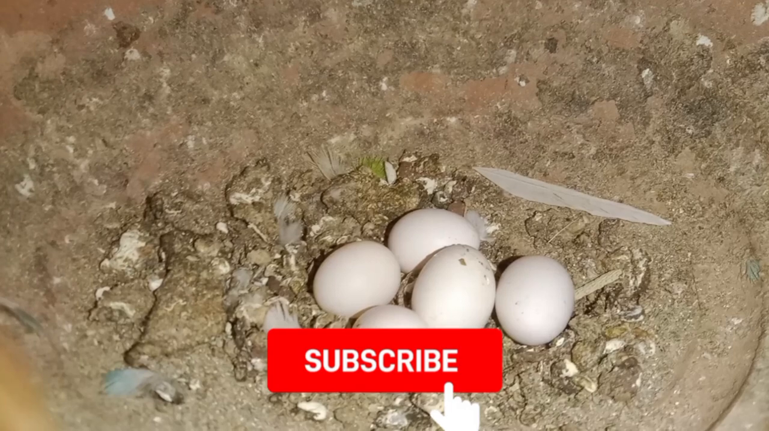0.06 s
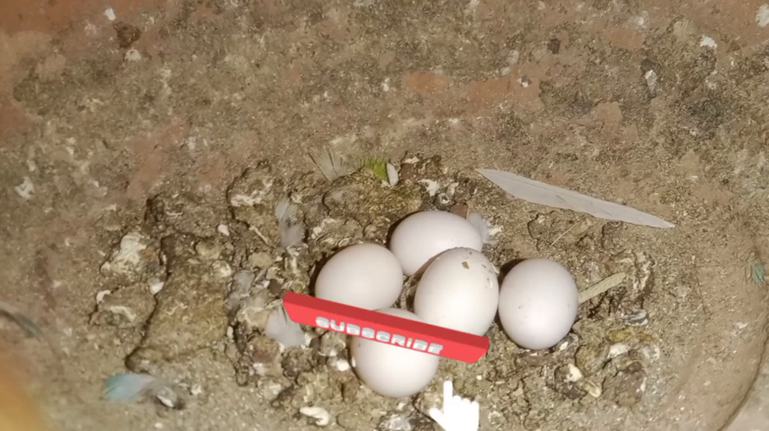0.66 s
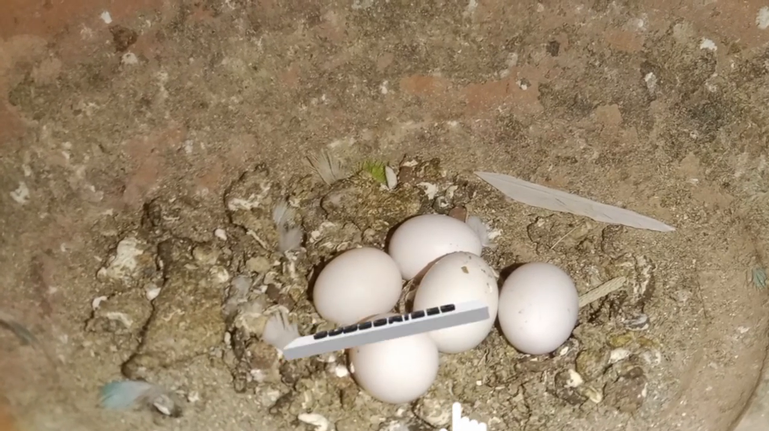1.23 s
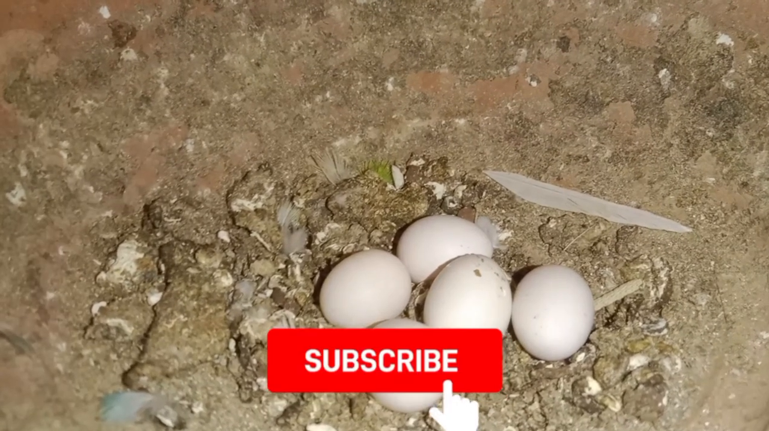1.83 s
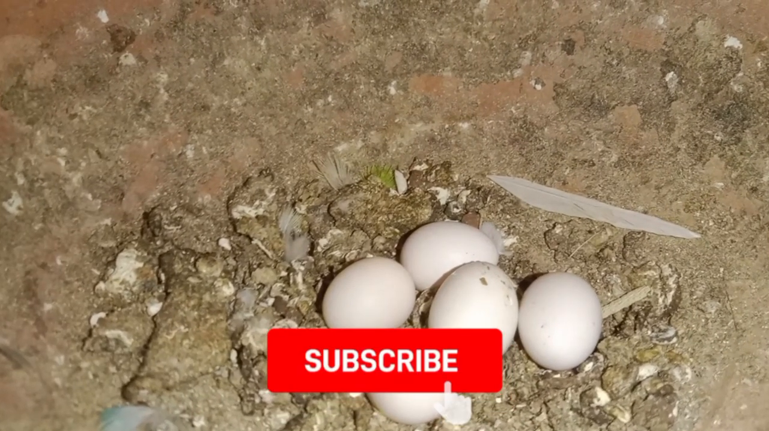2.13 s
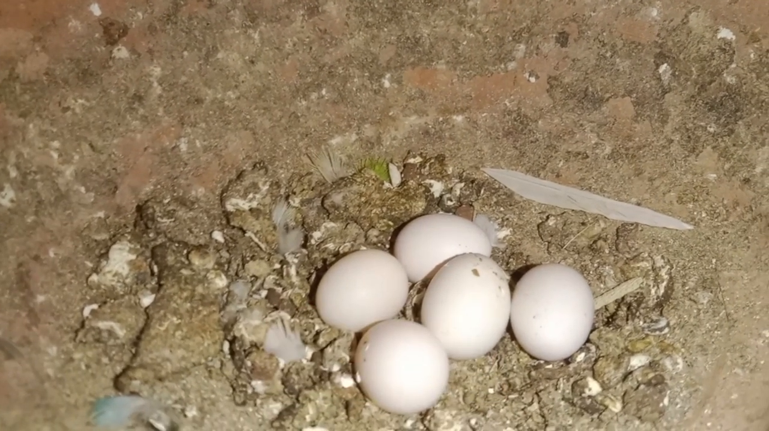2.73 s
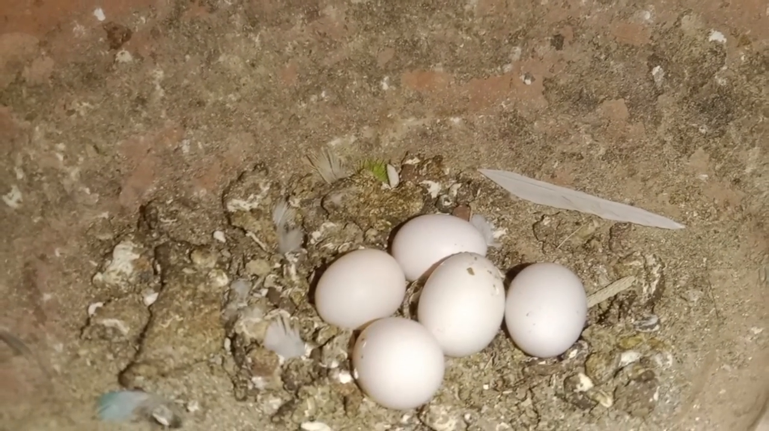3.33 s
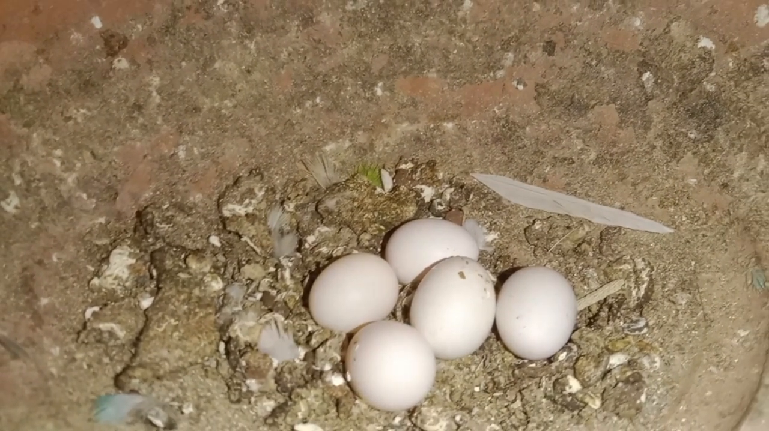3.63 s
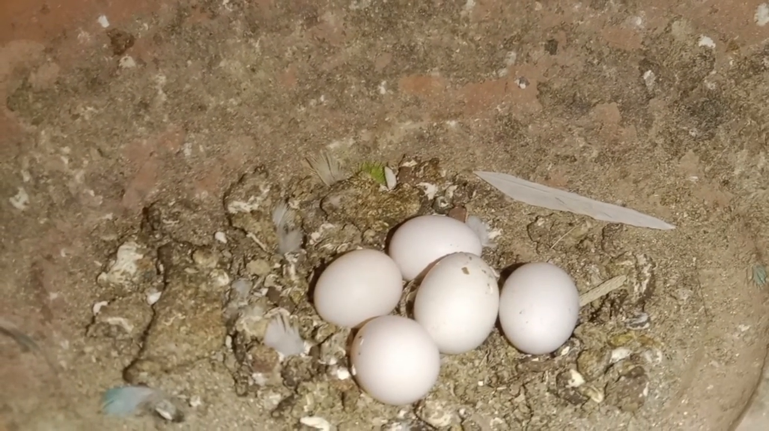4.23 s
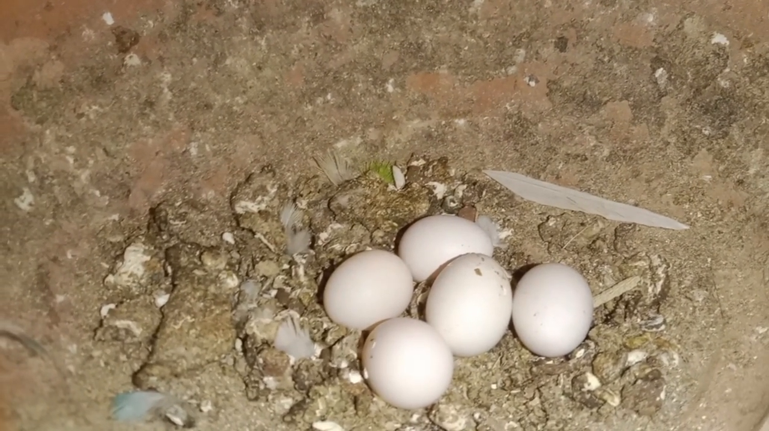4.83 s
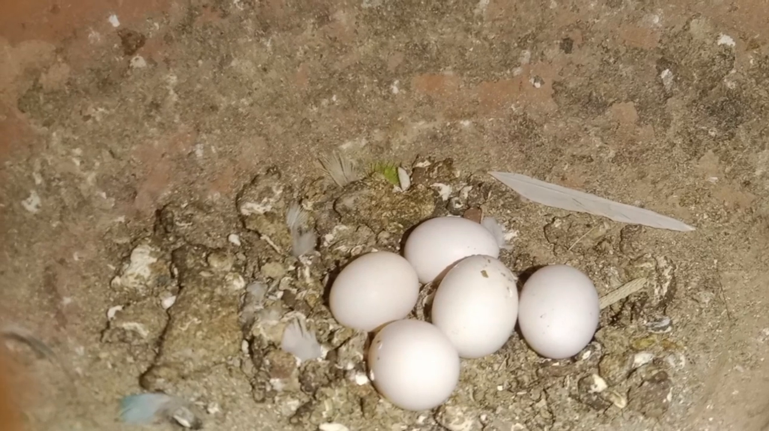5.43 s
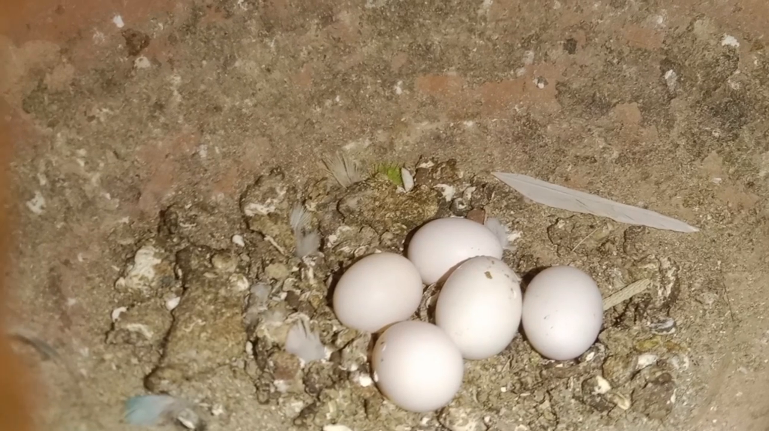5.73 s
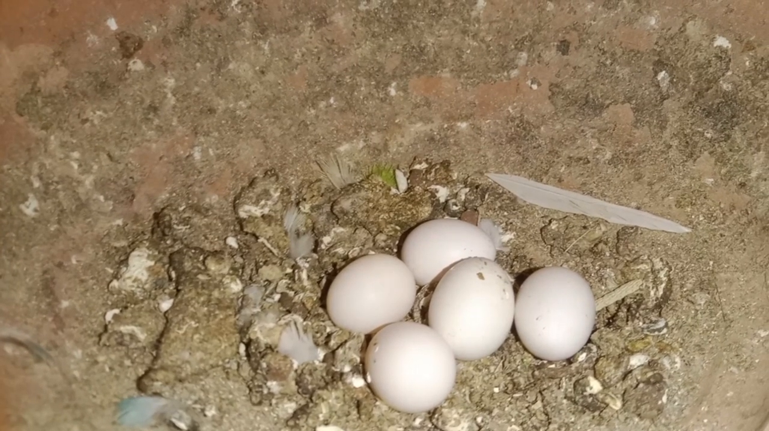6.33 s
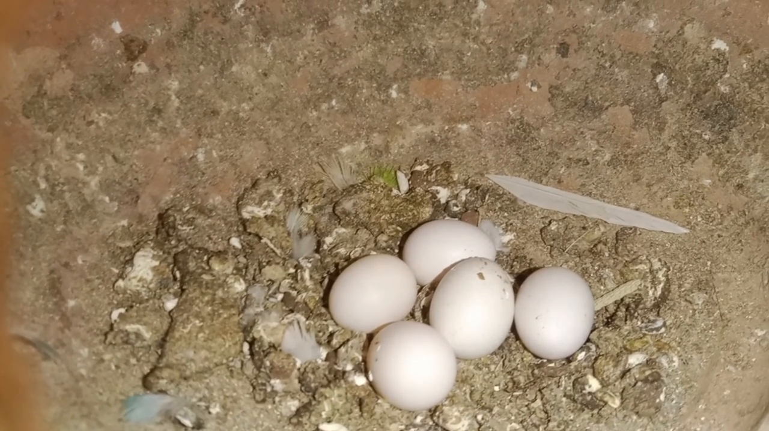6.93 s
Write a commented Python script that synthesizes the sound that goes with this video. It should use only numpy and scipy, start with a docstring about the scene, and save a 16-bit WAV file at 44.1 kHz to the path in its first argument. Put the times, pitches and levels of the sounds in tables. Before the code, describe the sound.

Close budgerigars chatter and scold in short spurts of high chirps, whistles and raspy notes, ending in loud squeals.

```python
'''Budgerigars warble and scold in an aviary, heard from inside a clay nesting pot.
The syrinx sounds gliding syllables and held whistles, hoarse when its membrane flutters; soft chatter,
harsh pulsed rasps and a faint scratch of claws run between them. The pot resonates with the calls,
is bumped once and later booms softly; a faint ringing follows the last loud squeal.
Other birds call far off over the blur of the flock, and a noise suppressor shuts the pauses.'''
import sys
import numpy as np
from scipy import signal
from scipy.fft import rfft, irfft, next_fast_len
from scipy.io import wavfile
from scipy.ndimage import uniform_filter1d, minimum_filter1d

SR = 44100
rng = np.random.default_rng(int(sys.argv[2]) if len(sys.argv) > 2 else 0)


def put_to_file(sound):
    """Save the sound as 16-bit audio at rate SR, in the file named by the first command-line argument."""
    columns = np.atleast_2d(sound).T  # one column per channel
    safe = np.clip(columns, -1, 1)
    whole_steps = np.round(safe * 32767)
    wavfile.write(sys.argv[1], SR, whole_steps.astype(np.int16))


N = 312228


def syrinx(hz, db, rough, overtone_db, flutter_hz=760, waver=.034, wobble=.15):
    """Modulation: a fluttering membrane puts sidebands around a harmonic tone and makes it hoarse."""
    # spectra of the overtones and of the breath: f/Hz, gain/dB
    overtone_colour = [(3500, -36), (4700, 7.5), (5800, 2.5), (7000, 3.5), (7900, 4), (8800, -13.5),
                       (10500, -30.5), (15000, -12.5)]
    breath_colour = [(4900, -15), (5600, 1), (8200, -1), (9500, -21)]
    n = len(hz)
    t = np.arange(n) / SR
    hz = hz * (1 + waver * wander(n, 99) + wobble * rough * wander(n, 500))
    phase = phase_of(hz)
    flutter = phase_of(flutter_hz * (1 + .17 * wander(n, 70)))
    strength = np.exp(.096 * rough * wander(n, 240)) * gain_of(3.5 * wander(n, 31))
    sidebands = 1.6 * rough * sum(wander(n, 80) * np.sin(phase + side * flutter) for side in (-1, 1))
    fluttered = phase + rough * np.sin(flutter)
    harmonics = strength * sum(np.sin(k * fluttered) * (k * hz < SR / 2) / k for k in range(2, 7))
    breath = coloured(.085 * rough * strength * rng.standard_normal(n), breath_colour)
    overtones = coloured(unit_rms(harmonics) + breath, overtone_colour)
    voice = unit_rms(strength * (np.sin(phase) + sidebands)) + gain_of(overtone_db) * unit_rms(overtones)
    return gain_of(db) * unit_rms(voice * fade(t, t[-1] - .01, .007, .01))


def syllables(throat_hz=2850, off_throat_db_per_octave=-2.5, inflect_hz=55, hoarse_overtone_db=7):
    """Resonance: a gliding note grows louder as its pitch nears the resonance of the throat."""
    # t/s, length/s, relative level/dB, start f/Hz, middle f/Hz, end f/Hz, roughness (0-1)
    glides = [(0.672, 0.043, -35, 3516, 3415, 2560, 0.1), (.724, 0.039, -36, 2090, 2770, 2760, 0.1),
              (0.885, 0.049, -32, 2333, 3457, 3930, 0.2), (0.919, 0.031, -31.5, 1821, 2065, 3280, 0),
              (0.947, 0.025, -31.5, 1608, 1787, 2660, .15), (0.954, 0.029, -25.5, 2927, 2997, 3880, 0.15),
              (0.977, 0.044, -24.5, 3015, 2912, 2954, 0.5), (1.038, 0.069, -26, 1885, 2543, 3120, 0.1),
              (1.83, 0.084, -43, 3047, 2814, 1970, 0.16), (1.913, 0.044, -36, 1934, 2876, 3160, 0.12),
              (2.187, 0.02, -31, 2850, 2600, 2840, 0.04), (2.209, 0.023, -24, 3363, 3446, 3040, 0.1),
              (2.219, 0.015, -21, 2973, 2400, 2122, 0), (2.239, 0.019, -28.5, 3067, 2568, 1780, 0.5),
              (2.262, 0.033, -26, 2233, 2906, 3070, 0.7), (2.286, 0.046, -28, 2124, 2747, 1920, 0.51),
              (2.456, 0.053, -35.5, 2860, 3290, 3000, 0.5), (2.489, 0.035, -31.5, 2720, 2910, 1700, 0.2),
              (2.526, 0.043, -25.5, 2910, 2618, 1970, 0.06), (2.566, 0.05, -24, 2540, 2943, 2930, 0.22),
              (2.97, 0.069, -36, 2494, 2860, 2930, 0.45), (3.025, 0.049, -24, 1844, 2468, 3270, 0.1),
              (3.084, 0.026, -28.5, 2717, 3225, 3630, 0.2), (3.108, 0.015, -23.5, 2830, 2474, 1890, 0.1),
              (3.12, 0.031, -22, 2547, 3126, 3460, 0.2), (3.154, 0.028, -22, 2242, 2130, 1820, 0),
              (3.191, 0.037, -20.5, 2147, 2650, 3420, 0.2), (3.516, 0.044, -23.5, 2390, 3020, 1975, 0.04),
              (3.555, 0.015, -23, 3980, 2940, 2590, 0.2), (3.584, 0.032, -19.5, 2345, 2888, 2900, 0.1),
              (3.613, 0.013, -28.5, 2755, 1676, 1090, 0.8), (3.829, 0.041, -36.5, 1790, 3150, 3940, 0.1),
              (3.872, 0.03, -26.5, 1716, 2110, 3620, .2), (3.897, 0.017, -31, 1935, 1722, 2660, 0),
              (3.919, 0.034, -26.5, 2905, 3227, 3070, 0.2), (3.963, 0.052, -18, 2643, 2543, 2890, 0.02),
              (3.993, 0.047, -17.5, 3104, 3400, 2850, 0), (4.029, 0.028, -27.5, 2687, 2032, 2570, 0.2),
              (4.059, 0.029, -21, 3065, 3168, 3070, 0.15), (4.175, 0.083, -33.5, 3003, 2373, 1686, 0.07),
              (4.26, 0.032, -35, 1680, 2600, 2540, 0.1), (4.525, 0.052, -36.5, 1717, 3087, 3160, 0.4),
              (4.71, 0.034, -26, 3530, 2466, 2400, 0.2), (4.734, 0.02535, -17, 3252, 2744, 2950, 0.2),
              (4.967, .065, -33, 1470, 2540, 2397, 0.32), (5.096, 0.023, -32, 3230, 2654, 2400, 0.13),
              (5.161, 0.015, -34, 2477, 2075, 1860, 0.18), (5.25, 0.017, -34, 3460, 2889, 2450, 0.19),
              (5.358, 0.039, -29.5, 3096, 2684, 2290, 0.28), (5.396, 0.049, -25.5, 1990, 2842, 3085, 0.23),
              (5.909, 0.044, -31.5, 2237, 2953, 3560, 0.38), (5.965, 0.028, -26.5, 1720, 2804, 2685, 0.46),
              (5.999, 0.017, -26, 1893, 2535, 3100, 0), (6.433, 0.019, -34, 3740, 3410, 2290, 0.23),
              (6.453, 0.016, -25.5, 3780, 3750, 3050, .35), (6.475, 0.029, -21, 2642, 3320, 3040, 0.2),
              (6.503, 0.0099, -27, 2770, 2360, 1630, 0.3), (6.514, 0.028, -22.5, 3170, 2980, 2630, 0.1),
              (6.533, 0.032, -19.5, 2880, 3427, 3270, 0.06), (6.546, 0.021, -18, 2870, 2637, 2380, 0.03),
              (6.571, 0.022, -18.5, 3260, 3025, 2970, 0.1), (6.61, 0.059, -28.5, 3145, 2920, 2770, 0.25),
              (6.678, 0.021, -22.5, 1850, 2054, 2650, 0.03), (6.708, 0.032, -29, 2780, 3094, 2930, 0.16),
              (6.751, 0.0305, -31, 2830, 2900, 3590, 0.29), (6.785, 0.013, -25.5, 2380, 2080, 1980, 0),
              (6.834, 0.042, -23.5, 2567, 2250, 3040, 0.01)]
    # overtones of a clean note from phrase to phrase: t/s, level/dB
    brightness = [(1.05, -21), (1.9, -35.5), (2.25, -20.5), (4.0, -23), (5.3, -15), (6.0, -31), (6.6, -23)]
    mix = np.zeros(N)
    for start, length, db, start_hz, middle_hz, end_hz, rough in glides:
        u = progress(length)
        arch_hz = middle_hz - (start_hz + end_hz) / 2
        hz = start_hz + (end_hz - start_hz) * u + arch_hz * np.sin(np.pi * u)
        hz *= 1 + .1 * rough * np.sin(2 * np.pi * (inflect_hz * length * u + rng.random()))
        throat_db = off_throat_db_per_octave * abs(np.log2(hz / throat_hz))
        overtone_db = np.interp(start, *np.transpose(brightness)) + hoarse_overtone_db * rough
        add(mix, start, syrinx(hz, db + throat_db - throat_db.mean(), rough, overtone_db))
    return mix


def whistles(rough=.094):
    """Nearly periodic oscillation: with little flutter the syrinx holds a clean, slightly sliding note."""
    # t/s, length/s, relative level/dB, start f/Hz, end f/Hz, overtone level/dB
    notes = [(0.472, 0.03, -37.5, 4300, 3730, -15.5), (0.508, 0.028, -22, 3437, 3570, -21),
             (2.172, 0.0352, -37, 4280, 3800, -18), (3.286, 0.043, -37.5, 4040, 4410, -21),
             (3.34, 0.05, -25, 3500, 3516, -18), (3.39, 0.032, -21.5, 3576, 3540, -22.5),
             (3.429, 0.043, -24.5, 4440, 4190, -22.5), (4.638, 0.025, -25.5, 4195, 3930, -13),
             (4.651, 0.018, -20.5, 2898, 2790, 4.5), (4.661, 0.083, -20.5, 3913, 3395, -15.5),
             (6.017, 0.005, -17, 3266, 3290, -28.5), (6.801, 0.026, -17, 2676, 3245, -10.5),
             (6.828, 0.032, -12, 3710, 3525, -5), (6.872, 0.039, -12, 3700, 3535, -11.5),
             (6.912, 0.014, -15.5, 4916, 4210, -18.5), (6.922, 0.022, -10.5, 3840, 4095, -19.5)]
    mix = np.zeros(N)
    for start, length, db, start_hz, end_hz, overtone_db in notes:
        hz = start_hz + (end_hz - start_hz) * progress(length)
        add(mix, start, syrinx(hz, db, rough, overtone_db))
    return mix


def rasps_and_scratch(pulse_hz=152, pitch_hz=3350, sweep=.39, jitter=.11):
    """Roughness by fast modulation: pulses of tone and noise fuse into a bird's rasp or a claw's scratch."""
    # rasps, and at 6.21 s a faint scratching of claws: t/s, length/s, relative level/dB, treble lift/dB
    bursts = [(0.283, 0.093, -58.5, -25.5), (0.659, 0.0071, -41, -11.5), (1.122, 0.033, -11, 9.5),
              (1.228, 0.044, -16.5, 7), (1.403, 0.054, -19.5, 7), (1.579, 0.04, -28.0, 4.5),
              (2.575, 0.033, -35.5, 11.5), (3.327, 0.019, -18.5, 7), (3.468, 0.038, -13, 4.5),
              (4.098, 0.027, -30, -16), (4.654, 0.053, -24.5, -3), (4.744, 0.021, -16.5, -14.5),
              (5.325, 0.031, -15.5, 4.5), (5.664, 0.023, -37, -8.5), (5.732, 0.032, -44, -10.5),
              (6.21, 0.078, -55.5, 5.5), (7.054, 0.024, -30, -7.5)]
    # their spectrum: f/Hz, gain/dB
    burst_colour = [(900, -49.5), (1400, -30), (1900, -6.5), (3300, 0.5), (4000, 1), (4600, -2), (5500, 2),
                    (7000, -1), (7900, -6.5), (8900, -24.5), (15000, -31.5)]
    mix = np.zeros(N)
    for start, length, db, treble_db in bursts:
        t = times(length + .017)
        cycle = np.cumsum(pulse_hz * (1 + jitter * wander(len(t), 120))) / SR % 1
        phase = phase_of(pitch_hz * (1 + sweep * (.35 - cycle) + .06 * wander(len(t), 1100)))
        tone = unit_rms(sum(a * np.sin(k * phase) for k, a in enumerate([1, 1, .72, .34], 1)))
        pulses = (tone + 2 * rng.standard_normal(len(t))) * (.61 + fade(cycle, .41, .01, .12))
        burst = coloured(coloured(pulses, burst_colour), [(3800, 0), (6000, treble_db)])
        swell = gain_of((5 + treble_db) * np.minimum(t / length, 1))  # bright bursts grow, dull ones sink
        add(mix, start, gain_of(db) * unit_rms(burst * swell * fade(t, length - .003, .0043, .021)))
    return mix


def chatter(birds=2, pitch_hz=1200, pitch_spread=.21, turn_hz=42, spread_db=5):
    """Superposition: low, overtone-rich voices bend and flicker independently and sum to a babble."""
    # t/s, length/s, relative level/dB, fundamental level/dB
    bouts = [(0.387, 0.16, -52.5, -4.5), (2.658, 0.18, -42, 2), (2.83, 0.18, -37.5, 1),
             (4.348, 0.17, -45, -21), (4.863, 0.1035, -38.5, -25.5), (5.019, 0.3, -42.5, -23.5)]
    # harmonics from the second up: level/dB
    harmonic_dbs = [8, -6.5, -12, -18.5, -12.5, -36]
    mix = np.zeros(N)
    for start, length, db, fundamental_db in bouts:
        t = times(length + .005)
        n = len(t)
        babble = np.zeros(n)
        for _ in range(birds):
            bend = pitch_spread * np.tanh(wander(n, turn_hz))
            phase = phase_of(pitch_hz * (1 + bend + .021 * wander(n, 750)))
            voice = sum(gain_of(part_db + spread_db * np.tanh(wander(n, turn_hz))) * np.sin(k * phase)
                        for k, part_db in enumerate([fundamental_db, *harmonic_dbs], 1))
            babble += voice * gain_of(spread_db * wander(n, turn_hz))
        add(mix, start, gain_of(db) * unit_rms(babble * fade(t, length, .01, .0057)))
    return mix


def cage_walls(x):
    """Interference: each glide beats with its own delayed reflections."""
    # delay t/s, level/dB
    reflections = [(.0068, -11), (0.0136, -20), (.024, -18.5)]
    mix = x.copy()
    for delay, db in reflections:
        add(mix, delay, gain_of(db) * x)
    return mix


def pot_cavity(x, width_hz=38):
    """Cavity resonance: the air in the pot rings at its natural frequencies."""
    # f/Hz, gain/dB
    modes = [(3160, 6.5), (3600, 0.5), (3927, -1), (4695, 0.5), (5656, 4), (7011, 6.5)]
    return sum(gain_of(db) * signal.lfilter(*signal.iirpeak(hz, hz / width_hz, SR), x) for hz, db in modes)


def pot_walls(x):
    """Selective attenuation: the pot's walls hollow out a band of the treble."""
    # f/Hz, gain/dB
    notch = [(4100, 1.5), (4850, -7.5), (5500, 1)]
    return coloured(x, notch)


def thumps():
    """Damped oscillation: low resonances of the pot swell under a push and decay exponentially."""
    # t/s, rise/s, peak level/dB, f/Hz, T60/s
    pushes = [(3.928, 0.0317, -39.5, 212, 0.076), (3.945, 0.037, -53.5, 105.6, 1),
              (6.428, 0.1378, -42.5, 145.6, 0.062)]
    mix, t = np.zeros(N), times(.5)
    for start, rise, db, hz, t60 in pushes:
        envelope = np.minimum(t / rise, 1) * gain_of(db - 60 * np.maximum(t - rise, 0) / t60)
        add(mix, start, envelope * np.sin(phase_of(hz * (1 + .11 * wander(len(t), 60)))))
    return mix


def far_calls_and_ringing(arch_db=5, sway_db=4.5):
    """Random frequency modulation blurs faint tones, the more the wider they glide."""
    # distant birds, and at 6.994 s a faint ringing near 2.8 kHz after the last loud squeal:
    # t/s, length/s, relative level/dB, start f/Hz, end f/Hz
    tones = [(0.168, 0.33, -63, 1560, 1456), (0.419, 0.08, -52, 1560, 867),
             (0.504, 0.76, -58.5, 1782, 1597), (0.691, 0.46, -55, 835, 779), (0.816, 0.026, -59, 400, 280),
             (1.237, 0.16, -64, 707, 717), (1.6, 0.5, -61, 844, 845), (2.455, 0.11, -59.5, 398, 443),
             (2.615, 0.014, -55, 826, 826), (2.982, 0.019, -53, 1047, 860), (4.355, 0.15, -59, 970, 1021),
             (5.739, 0.053, -53.5, 993, 844), (5.751, 0.27, -61, 1378, 1143),
             (6.317, 0.16, -66, 1594, 1435), (6.511, 0.57, -52.5, 1358, 1480), (6.429, 0.82, -63, 960, 988),
             (6.6, 0.189, -73.5, 364, 486), (6.994, 0.061, -52, 2905, 2780)]
    mix = np.zeros(N)
    for start, length, db, start_hz, end_hz in tones:
        t = times(length + .058)
        glide_hz = end_hz + (start_hz - end_hz) * (1 - t / t[-1]) ** 1.3
        blur = .014 + .14 * abs(np.log(start_hz / end_hz))
        phase = phase_of(glide_hz * (1 + .012 * wander(len(t), 14) + blur * wander(len(t), 220)))
        tone = np.sin(phase) + .16 * np.sin(2 * phase)
        swell = gain_of(arch_db * np.sin(np.pi * t / t[-1]) + sway_db * wander(len(t), 9.9))
        add(mix, start, gain_of(db) * unit_rms(tone * swell * fade(t, length - .02, .016, .071)))
    return mix


def reverberate(x, t60s):
    """Diffuse reverberation: dense reflections decay exponentially, each band at its own rate."""
    hz, t, spectra = signal.stft(rng.standard_normal(SR // 2), SR, nperseg=128)
    decay = gain_of(-60 * t / at_frequency(t60s, hz)[:, None])
    tail = signal.istft(spectra * decay, SR, nperseg=128)[1]
    tail[:SR // 1000] = 0  # no reflection in the first millisecond
    return signal.fftconvolve(x, tail / np.linalg.norm(tail))[:N]


def flock(restless_db=2):
    """Incoherent summation: many voices blur into noise, with the hollow note of the pot's mouth."""
    # course of the blur: t/s, level/dB
    levels = [(.3, -72.5), (.6, -65), (2.4, -67), (2.95, -56.5), (3.75, -63), (5.0, -58), (6.15, -63)]
    # its spectrum: f/Hz, gain/dB
    flock_colour = [(60, -16), (120, 1), (150, 8.5), (185, -11.5), (300, -12), (600, -17.5), (1200, -6),
                    (2300, 4), (3600, 1), (4700, -6), (7000, 1.5), (9200, -21), (15500, -33.5)]
    level_db = np.interp(np.arange(N) / SR, *np.transpose(levels)) + restless_db * wander(N, 27)
    return gain_of(level_db) * unit_rms(coloured(rng.standard_normal(N), flock_colour))


def gain_of(db):
    """Decibels to amplitude."""
    return 10 ** (np.asarray(db) / 20)


def unit_rms(x):
    """Scales to rms 1."""
    return x / np.sqrt(np.mean(x ** 2) + 1e-20)


def times(length):
    """Sample times in seconds."""
    return np.arange(int(length * SR)) / SR


def progress(length):
    """Runs from 0 to 1 over a note and 8 ms of release."""
    return np.linspace(0, 1, int((length + .008) * SR))


def phase_of(hz):
    """Phase is the time integral of angular frequency."""
    return 2 * np.pi * np.cumsum(hz) / SR


def at_frequency(points, hz):
    """Interpolates (f/Hz, value) points on a log-frequency axis."""
    f, value = np.transpose(points)
    return np.interp(np.log(hz + 1), np.log(f + 1), value)


def coloured(x, points):
    """Filters x by an (f/Hz, gain/dB) spectrum."""
    size = next_fast_len(2 * len(x))
    response = gain_of(at_frequency(points, np.fft.rfftfreq(size, 1 / SR)))
    return irfft(rfft(x, size) * response, size)[:len(x)]


def wander(size, hz):
    """Random fluctuation of rms 1, low-passed at hz."""
    lowpass = signal.butter(2, hz, fs=SR, output="sos")
    return unit_rms(signal.sosfilt(lowpass, rng.standard_normal(size + SR // 20))[-size:])


def fade(t, length, rise, fall):
    """Opens over rise, holds until length, closes over fall."""
    return np.sin(np.pi / 2 * np.clip(t / rise, 0, 1) * np.clip((length + fall - t) / fall, 0, 1)) ** 2


def add(mix, start, sound):
    """Mixes a sound in at start seconds."""
    part = mix[max(round(start * SR), 0):][:len(sound)]
    part += sound[:len(part)]


def scene():
    """Direct plus reverberant sound: near birds ring briefly in the pot and faintly in the aviary."""
    # reverberation of the aviary: f/Hz, T60/s
    aviary_t60s = [(200, 0.82), (2000, 0.69), (5000, 0.93), (12000, 0.48)]
    babble, bursts, faint = chatter(), rasps_and_scratch(), far_calls_and_ringing()
    highpass = signal.butter(8, 1520, "high", fs=SR, output="sos")
    warble = signal.sosfilt(highpass, pot_walls(syllables()) + whistles())
    near = gain_of(-4.5) * cage_walls(warble + pot_walls(babble)) + gain_of(-3) * bursts
    pot_reverb = gain_of(-5) * reverberate(near, [(2000, .089), (8000, .098)])
    near = near + pot_reverb + gain_of(-3) * pot_cavity(near)
    echoes = gain_of(-40.5) * reverberate(near, aviary_t60s)
    faint = gain_of(-5) * faint + gain_of(-6.5) * reverberate(faint, [(300, .27), (2000, .06)])
    return (near + pot_walls(echoes + flock()) + faint + thumps())[None]


def record(dry, open_db=-47, depth_db=25, slope=1.02, hush_db=-100, ceiling=.73, edge_hz=15750):
    """Downward expansion: a noise suppressor turns faint sound down; a limiter and a low-pass follow."""
    # threshold above which steady tones are let through: f/Hz, level/dB
    tone_threshold = [(900, -63), (1700, -80), (3000, -60)]
    level_db = 10 * np.log10(abs(uniform_filter1d(dry[0] ** 2, size=900)) + 1e-12)
    cut_db = uniform_filter1d(np.clip(slope * (open_db - level_db), 0, depth_db), size=400)
    hz, t, spectra = signal.stft(dry[0], SR, nperseg=512, noverlap=384)
    held = abs(uniform_filter1d(abs(spectra), size=5, axis=1)) + 1e-9
    tonal = np.clip((20 * np.log10(held) - at_frequency(tone_threshold, hz)[:, None]) / 7, 0, 1)
    spectra *= gain_of(-np.interp(t, np.arange(N) / SR, cut_db) * (1 - tonal))
    spectra *= held ** 2 / (held ** 2 + gain_of(hush_db) ** 2)  # hushes the faintest bands even in a call
    quiet = signal.istft(spectra, SR, nperseg=512, noverlap=384)[1][None, :N]
    safe_gain = np.minimum(1, ceiling / (abs(quiet) + 1e-9))
    limited = quiet * uniform_filter1d(minimum_filter1d(safe_gain, size=131), size=131)
    lowpass = signal.firwin(511, edge_hz, window=("kaiser", 9), fs=SR)
    return signal.oaconvolve(limited, lowpass[None], "same")


dry = scene()
out = record(dry)
put_to_file(out)
```